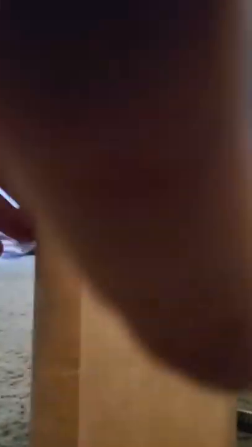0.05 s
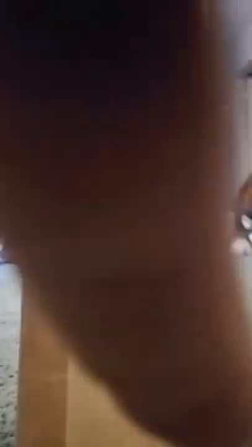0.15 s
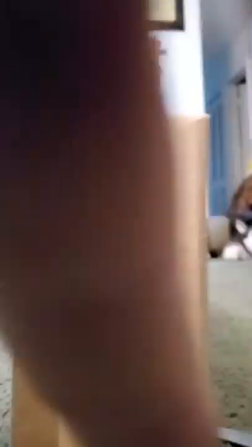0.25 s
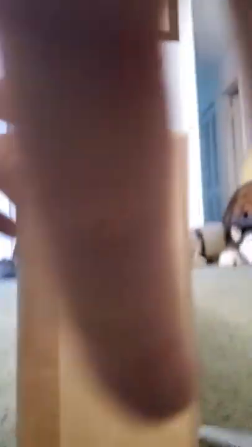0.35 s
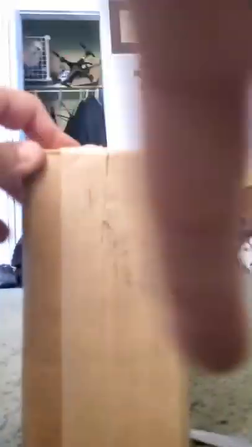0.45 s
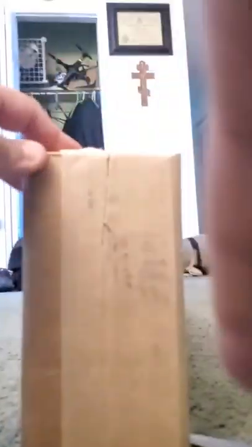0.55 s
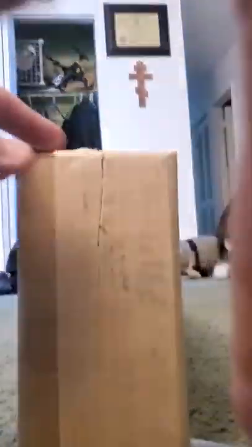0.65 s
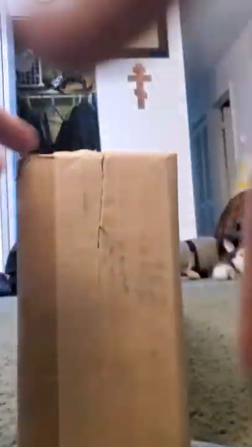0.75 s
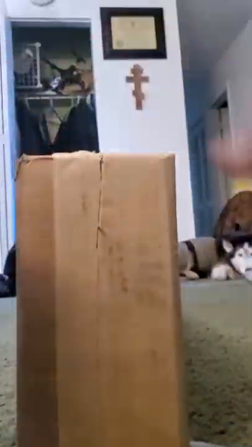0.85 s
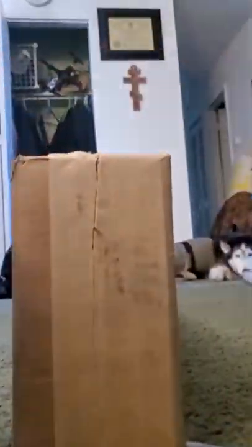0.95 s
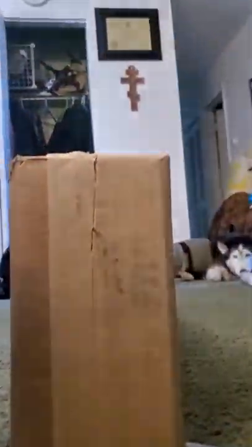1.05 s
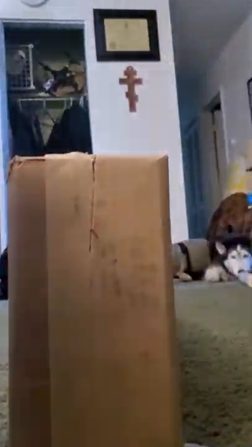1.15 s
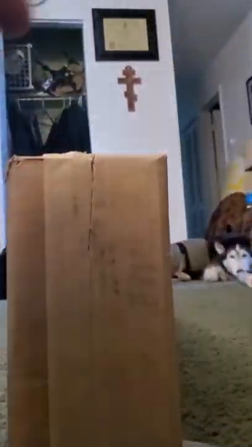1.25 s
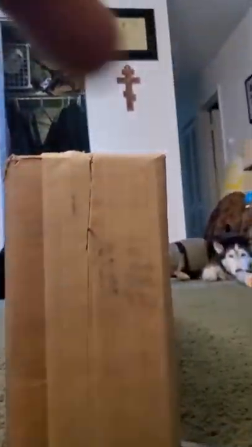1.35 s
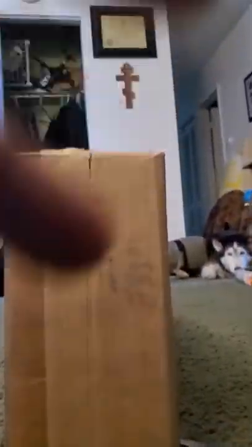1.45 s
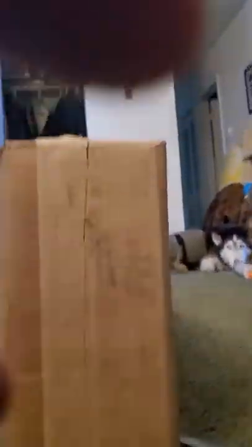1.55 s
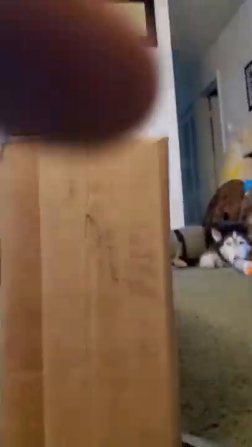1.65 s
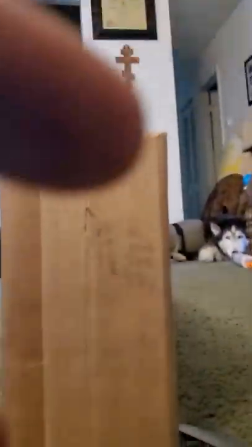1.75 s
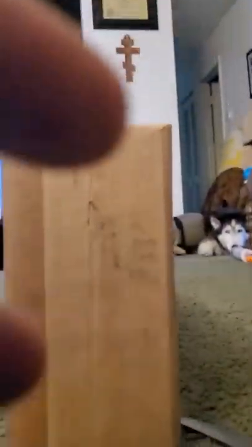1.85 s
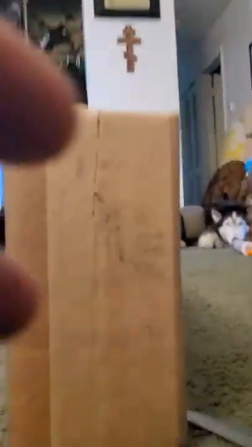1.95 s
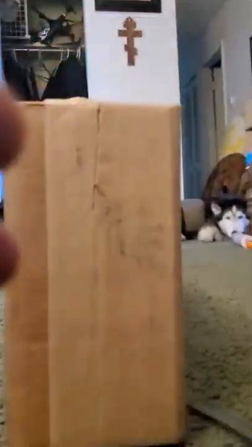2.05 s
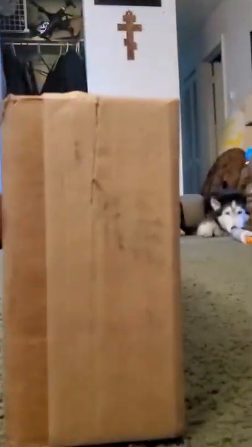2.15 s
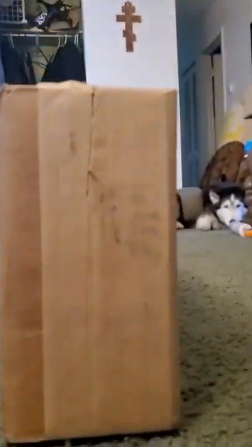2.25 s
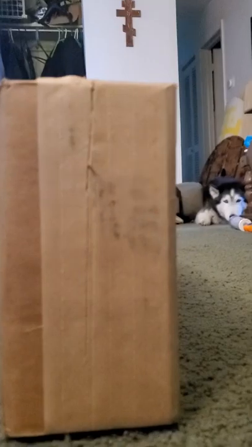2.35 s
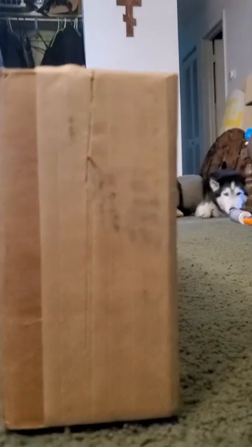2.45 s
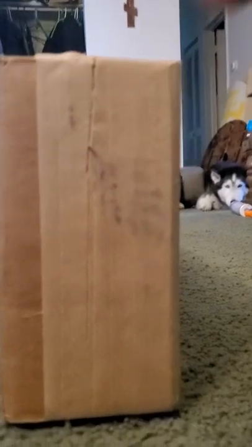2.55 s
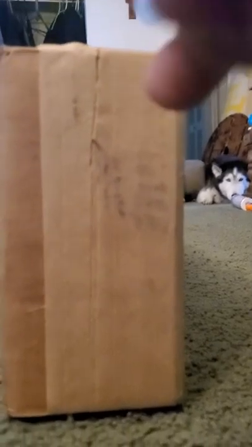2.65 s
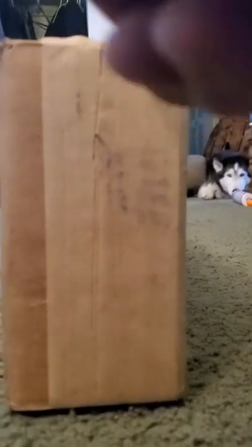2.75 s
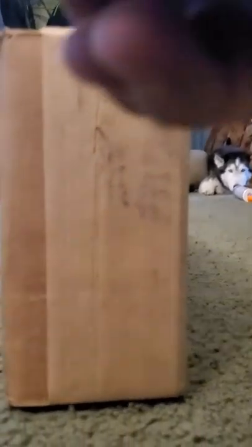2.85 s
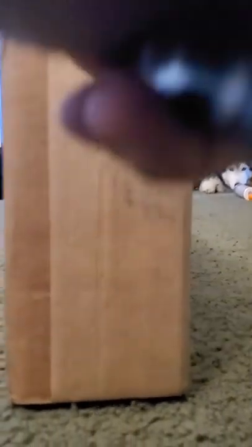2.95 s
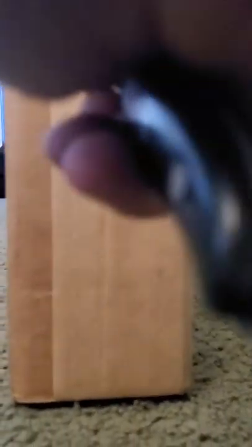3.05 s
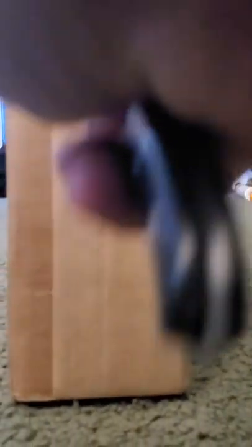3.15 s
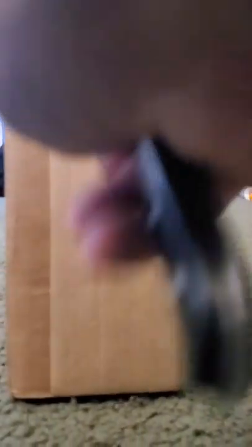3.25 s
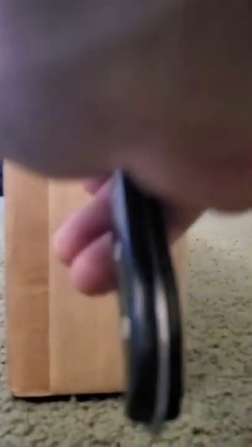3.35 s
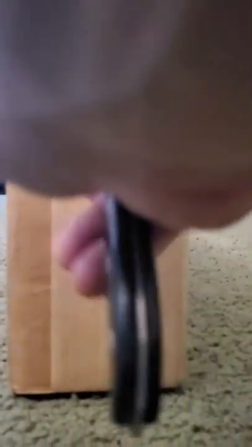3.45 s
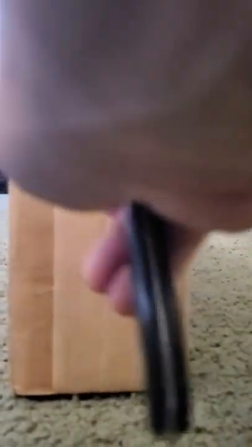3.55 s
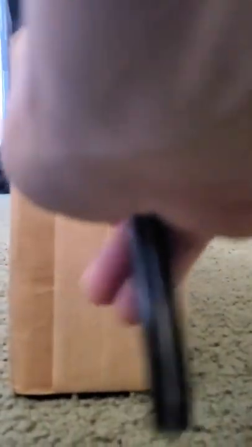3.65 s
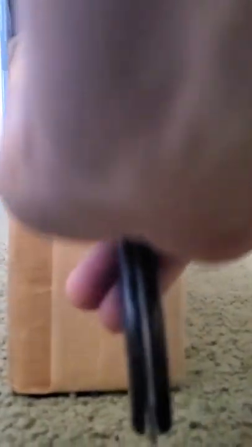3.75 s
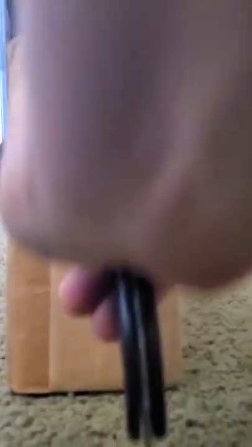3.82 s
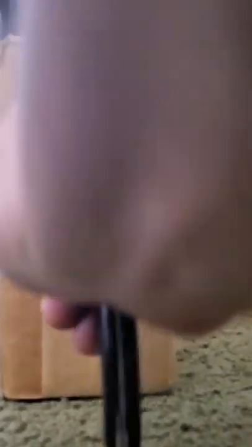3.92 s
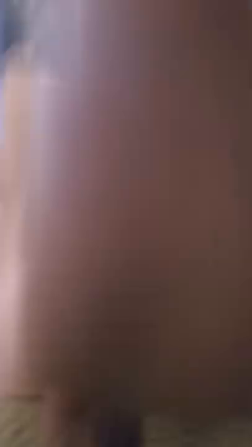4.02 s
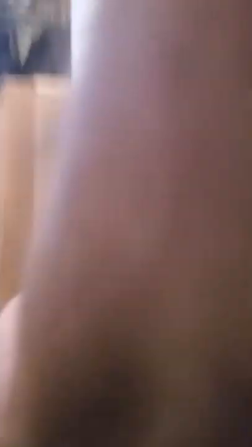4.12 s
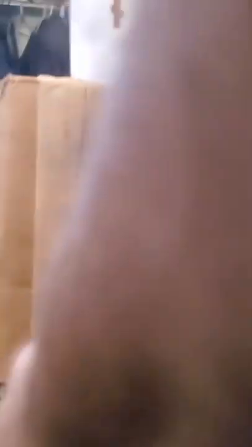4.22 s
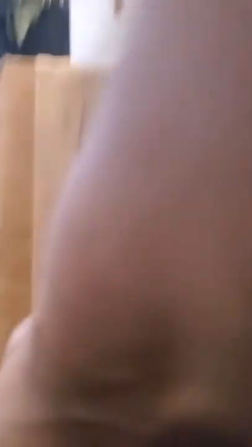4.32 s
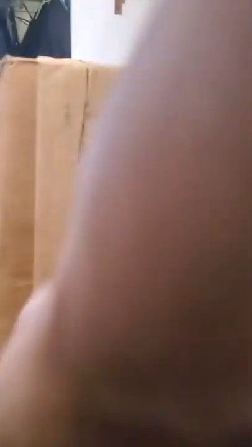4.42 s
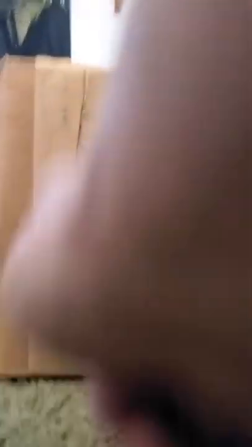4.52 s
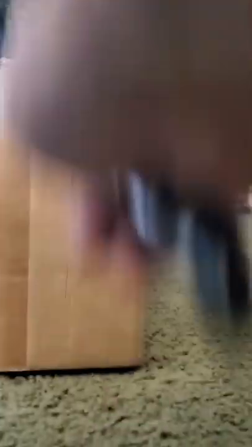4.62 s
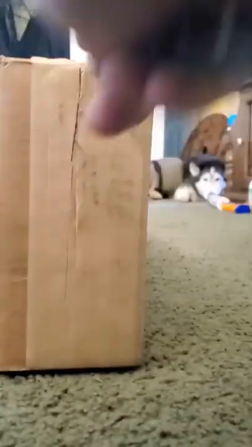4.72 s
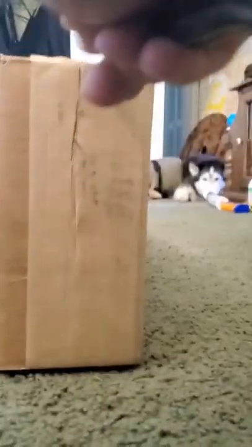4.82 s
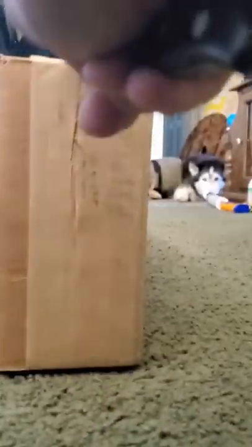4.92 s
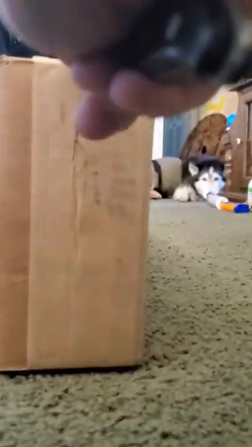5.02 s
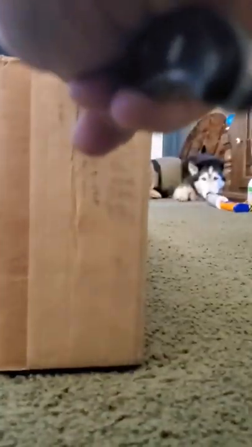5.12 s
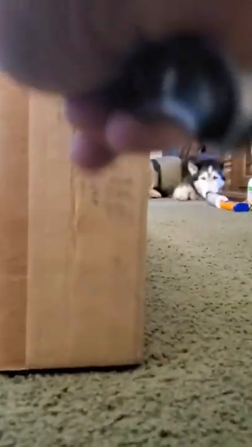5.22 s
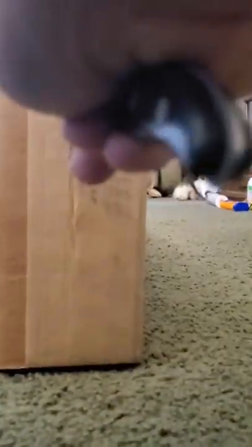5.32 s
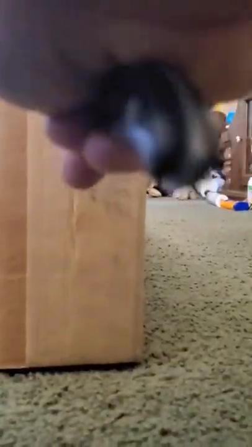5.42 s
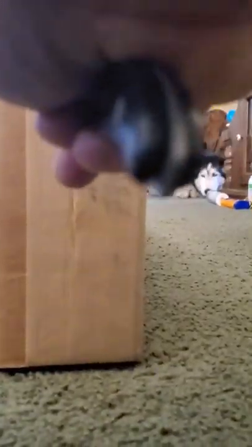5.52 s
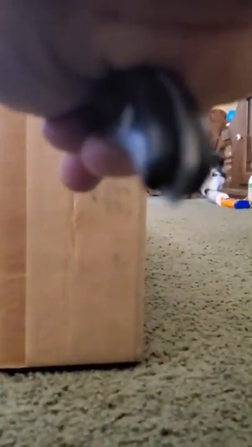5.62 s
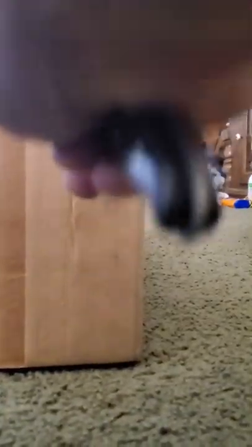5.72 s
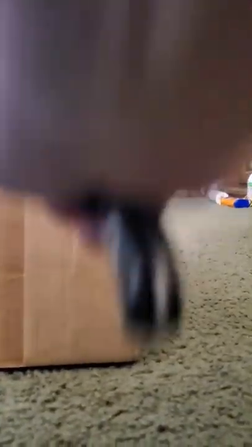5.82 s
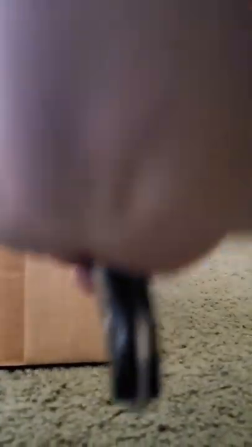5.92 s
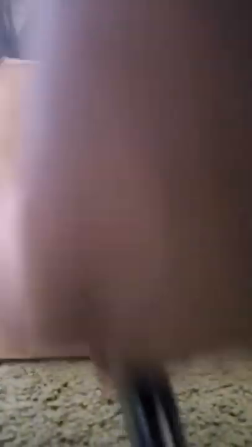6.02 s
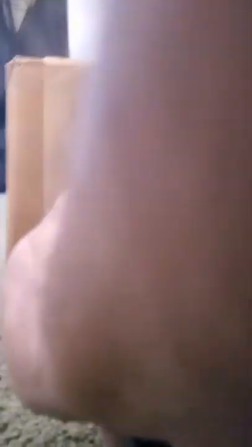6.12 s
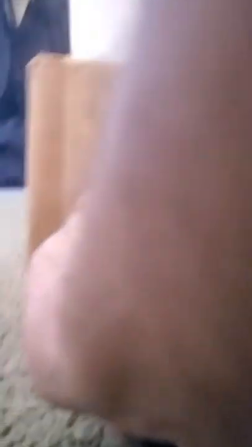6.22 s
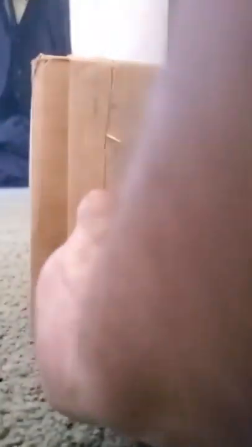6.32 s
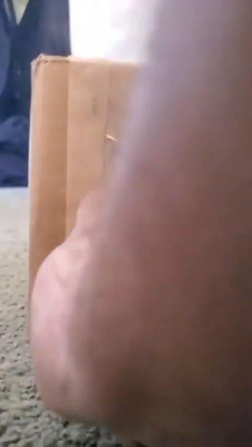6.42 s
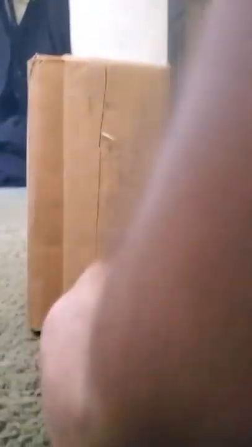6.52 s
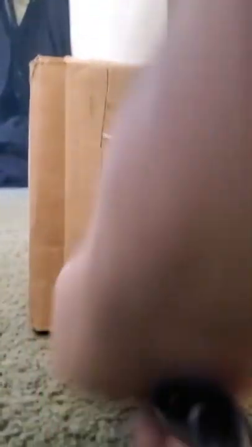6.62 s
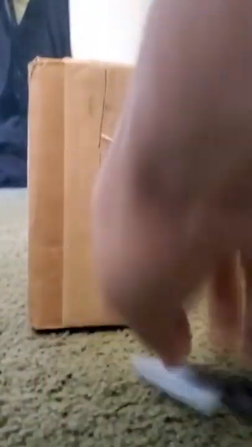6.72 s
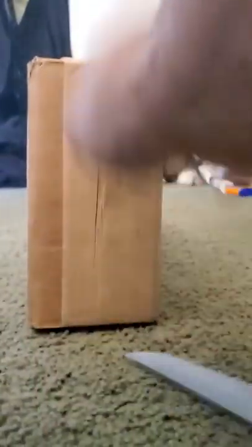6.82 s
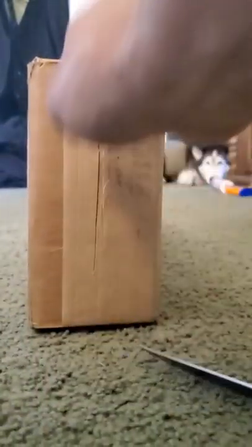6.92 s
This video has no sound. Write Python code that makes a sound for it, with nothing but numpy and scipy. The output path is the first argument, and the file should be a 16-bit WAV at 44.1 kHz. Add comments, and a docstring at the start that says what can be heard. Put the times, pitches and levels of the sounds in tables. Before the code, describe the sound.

Close finger rustling and sticky ticks give way to short tape rips, dull knocks on a cardboard box and a brief blade scrape.

```python
"""On a carpet in a quiet, humming room, hands work packing tape and a folding knife by a cardboard box.
Strokes stick and slip: they rip, scrape and drum dully in the box and floor, among knocks and the
ticks of snapping glue. Fingers rub, and the blade slides open, steel on steel. We listen from a phone
close by that rocks a little; its left microphone port has a bright resonance, its right one is dull."""
import sys
import numpy as np
from scipy import signal
from scipy.fft import rfft, irfft, next_fast_len
from scipy.io import wavfile
from scipy.ndimage import uniform_filter1d, map_coordinates

SR = 44100
rng = np.random.default_rng(int(sys.argv[2]) if len(sys.argv) > 2 else 0)


def wrap_up_sound(samples):
    """Save the sound to the file named by the first command line argument, as 16-bit audio."""
    columns = np.atleast_2d(samples).T
    # keep every value between -1 and 1, then stretch to whole-number steps
    tamed = np.clip(columns, -1, 1)
    steps = np.round(tamed * 32767).astype(np.int16)
    wavfile.write(sys.argv[1], SR, steps)


N = 307677


def amp(db):
    return 10 ** (np.asarray(db) / 20)


def unit(x):
    return x / np.sqrt(np.mean(x ** 2) + 1e-20)


def sides(pan_db):
    """Left and right gains. Pan is always left minus right, in dB."""
    return amp(np.array([pan_db / 2, -pan_db / 2]))


def along(points, hz):
    """Read a curve of (Hz, value) points on a log frequency axis."""
    freqs, values = np.transpose(points)
    return np.interp(np.log(hz + 1), np.log(freqs + 1), values)


def curves(rows):
    """Fader moves: one value per sample for each column after the time."""
    times, *columns = np.transpose(rows)
    return [np.interp(np.arange(N) / SR, times, column) for column in columns]


def wobble(rate):
    """A smooth random curve, rate knots a second."""
    knots = rng.standard_normal(int(N * rate / SR) + 4)
    return map_coordinates(knots, [np.arange(N) * rate / SR])


def bursts(start, length, level_db, rise, fall, swell=0):
    """The joint envelope in dB of events that rise, swell or sag, and fall, all in dB per second."""
    grid = np.arange(0, N, 16)
    since = grid / SR - start[:, None]
    length, level_db, swell = (np.reshape(v, (-1, 1)) for v in (length, level_db, swell))
    shape_db = rise * np.minimum(since, 0) + swell * np.clip(since, 0, length)
    shape_db -= fall * np.maximum(since - length, 0)
    power = amp(2 * (level_db + shape_db)).sum(axis=0)
    return np.interp(np.arange(N), grid, 10 * np.log10(power + 1e-20))


def filtered(x, response):
    """x through a complex frequency response."""
    size = next_fast_len(N + SR // 2)
    return irfft(rfft(x, size) * response(np.fft.rfftfreq(size, 1 / SR)), size)[..., :N]


def eq(x, points):
    """x through an EQ curve of (Hz, dB) points."""
    return filtered(x, lambda f: amp(along(points, f)))


def resonances(modes):
    """The response of (Hz, width in Hz, dB) modes of alternating polarity."""
    return lambda f: sum((-1) ** k * amp(db) * 1j * f * width / (hz * hz - f * f + 1j * f * width)
                         for k, (hz, width, db) in enumerate(modes))


def coloured(x, spectrum):
    """x in the given colour, which shifts in patches as the rubbed surface bends and creases."""
    frames = signal.stft(eq(x, spectrum))[2]
    patches = rng.standard_normal(frames.shape[-2:])
    patches = uniform_filter1d(uniform_filter1d(patches, size=5, axis=0), size=9, axis=1)
    return unit(signal.istft(frames * amp(3.15 * unit(patches)))[1][..., :N])


def slips(rate, spread_db, smooth):
    """Stick-slip: rate tiny breaks a second, uneven in size, over a share of smooth sliding."""
    size_db = spread_db * np.minimum(rng.exponential(size=N), 3.5)
    breaks = (rng.random(N) < rate / SR) * rng.choice([-1, 1], N) * amp(size_db)
    return np.sqrt(1 - smooth) * unit(breaks) + np.sqrt(smooth) * rng.standard_normal(N)


# The colour of room and microphone noise. Each row: frequency in Hz, gain in dB.
AIR_EQ = [(15, -71), (25, -47.5), (58, -0.5), (92, -8.5), (124, 0), (187, -9), (273, -10.5), (330, -10.5),
          (445, -20.5), (483, -11.5), (902, -25), (15200, -56), (16500, -44.5)]
# Where that noise leans. Each row: frequency in Hz, pan in dB.
AIR_PAN = [(60, 3), (240, -1.5), (950, -9.5), (3770, 21.5), (15000, 16)]

def air(level_db=-55):
    """A steady bed of noise, shared by the ports in the bass only."""
    mid, side = rng.standard_normal((2, N))
    width = lambda f: np.arccos(along([(100, 0.95), (400, 0.7), (1200, 0.02)], f)) / 2
    mid = filtered(mid, lambda f: amp(along(AIR_EQ, f)) * np.cos(width(f)))
    side = filtered(side, lambda f: amp(along(AIR_EQ, f)) * np.sin(width(f)))
    bed = filtered(np.array([mid + side, mid - side]), lambda f: sides(along(AIR_PAN, f)))
    return amp(level_db + 0.61 * wobble(2.9)) * unit(bed)


# An appliance's tones. Each row: pitch in Hz, relative level in dB.
HUM_TONES = [(76, -59), (119.5, -61), (480, -69)]

def hum():
    """An appliance drones, each tone drifting slightly in level and phase."""
    t = np.arange(N) / SR
    return sum(amp(db + 4.0 + 1.6 * wobble(2.0)) * np.sin(2 * np.pi * hz * t + 0.38 * wobble(5.1))
               for hz, db in HUM_TONES)


# The room's decay. Each row: frequency in Hz, seconds to fall 60 dB.
ROOM_DECAY = [(200, 0.17), (10000, 0.083)]

def room(x):
    """A short reverb whose treble dies first."""
    hz, t, frames = signal.stft(rng.standard_normal((2, SR // 2)), SR, nperseg=256)
    decay = amp(-60 * t / along(ROOM_DECAY, hz)[:, None])
    tail = signal.istft(frames * decay, SR, nperseg=256)[1]
    return signal.fftconvolve(x, tail / np.linalg.norm(tail[0]), axes=1)[:, :N]


# The rumble of the swaying phone. Each row: frequency in Hz, gain in dB.
SWAY_EQ = [(15, -2.5), (45, 4), (100, -7), (300, -79.5)]
# Jolts that rock it on the pile. Each row: time in seconds, relative peak in dB.
PHONE_JOLTS = [(0.42, -46), (0.53, -45), (1.516, -37), (1.555, -42), (3.92, -40), (4.06, -28), (4.16, -25),
               (4.33, -35), (6.1, -29), (6.18, -30.5), (6.41, -45.5), (6.58, -35), (6.9, -38)]

def rocking(rest_db=-61.5):
    """The phone's own slow motion, felt mostly by the right port."""
    time, peak_db = np.transpose(PHONE_JOLTS)
    level = amp(rest_db) + amp(bursts(time, 0, peak_db, rise=901.5, fall=159))
    shared, left_only = eq(rng.standard_normal((2, N)), SWAY_EQ)
    return level * np.array([0.7 * unit(0.6 * shared + left_only), 2.05 * unit(shared)])


# The crackle's fader. Each row: time in seconds, relative level in dB.
CRACKLE_FADER = [(1.45, -92), (1.6, -68), (2.1, -65), (2.5, -67.5), (3.15, -63.5), (3.9, -82)]

def crackle():
    """Dry clicks from sleeve and tape beside the right port."""
    level_db, = curves(CRACKLE_FADER)
    colour = [(1000, -19), (4000, 5.5), (8000, -11.5), (16000, -9.5)]
    clicks = unit(eq(slips(90, spread_db=3.5, smooth=0), colour))
    return amp(level_db) * clicks * sides(-23.0)[:, None]


# Fingertip buzzes. Each row: start in seconds, length in seconds, relative level in dB, pitch in Hz.
FINGERTIP_SHUDDERS = [(0.045, 0.1, -43, 101), (0.273, 0.079, -42, 104.8), (0.414, 0.016, -39, 74.8)]

def shudders():
    """A wavering low tone while skin sticks and slips on the phone's back."""
    out, t = np.zeros(N), np.arange(N) / SR
    for start, length, db, hz in FINGERTIP_SHUDDERS:
        level_db = bursts(np.array([start]), length, db, rise=600, fall=700) + 1.3 * wobble(30.3)
        out += amp(level_db) * np.sin(2 * np.pi * hz * t + 0.68 * wobble(29.0))
    return out * sides(2.2)[:, None]


# The colours of skin rub, finger rustle and the left port's fizz. Each row: frequency in Hz, gain in dB.
RUB_EQ = [(60, -10), (110, -2), (250, -1), (500, 2.5), (900, -2.5), (1400, -9), (2500, -24.5)]
FINGER_RUSTLE_EQ = [(700, -3), (1300, -4.5), (1700, 0), (2200, -3), (2600, -4), (4200, -5.5), (6500, -11),
                    (10000, -21), (16000, -18)]
FIZZ_EQ = [(4000, -25.5), (7000, -12), (11400, -11), (12200, -3), (14000, -1.5), (16000, -2.5)]
# The hollow of the hand over the right port. Each row: centre in Hz, width in Hz, gain in dB.
HAND_HOLLOW = [(2100, 500, 0)]
# Faders for fingers on phone, box and knife.
# Each row: time in seconds, then rub, rustle, rustle pan and fizz, all in dB.
FINGER_FADERS = [(0.0, -39.5, -55.5, -15, -50), (0.046, -40.5, -42, -10, -39),
                 (0.075, -47.5, -46.5, -11, -41), (0.15, -38, -49, -9, -50), (0.17, -45, -40.5, 1.5, -34.5),
                 (0.24, -52.5, -46, 5, -44.5), (0.32, -41, -45.5, -9, -50), (0.504, -39, -47.5, -21, -49.5),
                 (0.56, -51.5, -50, -9.5, -48), (0.65, -51, -48, -15.5, -54),
                 (0.77, -59, -57, -19.5, -56.5), (0.89, -68, -54.5, 5, -48.5), (1.0, -60, -49.5, -9.5, -53),
                 (1.33, -61.5, -51.5, -3, -53), (1.5, -67, -60, -4, -62.5), (1.52, -44, -52, -28.5, -66.5),
                 (1.545, -70, -63, -21, -62), (1.57, -58.5, -49, -25.5, -69.5),
                 (1.65, -70, -61.5, -19.5, -70), (1.73, -65.5, -54, -28.5, -72),
                 (1.82, -66.5, -69, -13.5, -72.5), (1.9, -57.5, -50, -21, -56.5),
                 (2.05, -58.5, -51.5, -21.5, -67), (2.17, -56.5, -60, -4, -57),
                 (2.35, -71, -47, 0.5, -47.5), (2.54, -60.5, -58, 1, -53), (2.57, -73, -50.5, -7, -40),
                 (2.72, -57.5, -51.5, -6, -50), (2.8, -66.5, -51, -5.5, -65), (2.93, -62, -49, 0, -47.5),
                 (3.05, -67, -54, -8.5, -64.5), (3.36, -67, -58, -1, -57.5), (3.8, -65, -54.5, -4, -56),
                 (4.55, -72.5, -60, -3.5, -58.5), (4.87, -73, -63, -3, -55.5), (5.06, -71, -83, 4, -49.5),
                 (5.45, -65, -70.5, 19, -56), (5.7, -79, -72, -7, -71), (6.0, -54.5, -55, 3, -52.5),
                 (6.35, -50.5, -52, -4, -49.5), (6.5, -75, -62, -3, -57.5), (6.98, -69, -60, -2, -62.5)]

def fingers():
    """Skin drags near the ports: a broad rub, a hollow crackly rustle and a bright fizz."""
    rub_db, rustle_db, pan_db, fizz_db = curves(FINGER_FADERS)
    shake_db = 0.53 * wobble(16)  # the hand's speed is unsteady
    drag = np.array([slips(500, spread_db=1.5, smooth=0.84), slips(500, spread_db=1.0, smooth=1.0)])
    mid, side = coloured(drag, RUB_EQ)
    skin = np.array([mid + 0.96 * side, mid - 0.68 * side])
    rub = amp(rub_db + 0.75 * wobble(24.73)) * sides(-6.0)[:, None] * skin
    fine = np.array([slips(900, spread_db=4.5, smooth=0.67), slips(700, spread_db=5.0, smooth=0.66)])
    rustle = amp(rustle_db + shake_db - 1.0) * sides(pan_db) * coloured(fine, FINGER_RUSTLE_EQ)
    cupped = np.clip(-pan_db / 25, 0, 1) ** 2  # the closer the hand to the right port, the more it rasps
    rasp = unit(filtered(fine[1], lambda f: resonances(HAND_HOLLOW)(f) ** 2))  # two passes narrow it
    rustle[1] += amp(rustle_db + shake_db + 0.5) * cupped * rasp
    finest = np.array([slips(2800, spread_db=1.5, smooth=0.2), slips(800, spread_db=-7.5, smooth=0.29)])
    fizz = amp(fizz_db + shake_db + [[5.5], [-8]]) * coloured(finest, FIZZ_EQ)
    return rub + rustle + fizz


# The blade's ringing bands. Each row: centre in Hz, width in Hz, gain in dB.
BLADE_MODES = [(1020, 200, 11.5), (2670, 210, 17), (3500, 440, 8), (4980, 160, 6), (12900, 930, 7)]
# The fader for its slide. Each row: time in seconds, level in dB.
BLADE_FADER = [(5.066, -69), (5.078, -43), (5.15, -49.5), (5.24, -55), (5.3, -98)]

def blade():
    """The knife opens: steel slides on steel and sings in a few fuzzy bands."""
    level_db, = curves(BLADE_FADER)
    friction = rng.standard_normal((2, N))
    lean_left = lambda f: sides(along([(3000, 6.4), (12000, 30.6)], f))
    return amp(level_db) * unit(filtered(friction, lambda f: resonances(BLADE_MODES)(f) * lean_left(f)))


# Glue and fibres snapping. Each row: start in seconds, relative level in dB, pan in dB, pitch in Hz.
GLUE_SNAPS = [(1.52, -26, -27, 1230), (1.603, -27.5, -35, 2180), (1.681, -28.5, -16, 1670),
              (1.698, -28.5, -23, 2140), (1.715, -37.5, -18, 2280), (1.7235, -34, -20, 3500),
              (1.9387, -26.5, -20, 2050), (1.969, -30.5, -16, 4000), (2.007, -26.5, -21.5, 1900),
              (1.9748, -24, -24, 2390), (2.044, -28, -21, 4000), (2.121, -27, -22, 3500),
              (2.07, -29, -22.5, 2200), (2.257, -29.5, -11, 2680), (2.695, -27.5, -18.5, 4500),
              (2.7507, -28.5, -25.5, 2200), (2.8, -24.5, -15.5, 4200), (2.821, -28.5, -15.5, 3030),
              (2.921, -34, -8, 3100), (2.957, -32.5, -10, 3900), (3.0853, -32.5, -15, 4270),
              (3.1035, -28, -23.5, 4030), (3.1993, -22, -13.5, 4400), (3.252, -37.5, -21, 4360),
              (3.259, -30.5, -18, 4000), (3.517, -28, -23, 4500), (3.871, -29.5, -21, 4580),
              (3.8995, -17, 20, 5300), (4.0526, -19, 18, 5760), (4.2891, -18, 2, 1900),
              (4.354, -41, -10, 3000), (4.438, -30, -21, 5370), (4.7369, -15, 17, 3730),
              (4.771, -22.5, 23, 2400), (4.9536, -31, 26, 2500), (5.3195, -26, 2, 2730),
              (5.3806, -34.5, 14, 4500), (5.9, -25.5, 17, 6040), (6.0876, -6.5, 18, 3670),
              (6.2425, -21.5, -16.5, 1730), (6.276, -38, 15, 3170), (6.4475, -37, 12, 4430),
              (6.529, -27, 21, 2480), (6.5628, -19, 10, 3000)]

def ticks():
    """Each snap is a cycle or two at its pitch, with a rough edge that differs at each port."""
    out, t = np.zeros((2, N + SR)), np.arange(SR // 100) / SR
    for start, db, pan_db, hz in GLUE_SNAPS:
        snap = amp(-60 * t * hz / 3.04) * np.sin(2 * np.pi * hz * t)
        edge = 0.2 * amp(-60 * t / 0.0049) * rng.standard_normal((2, len(t)))
        gains = amp(db + 4) * sides(pan_db)[:, None] / sides(pan_db).mean()
        out[:, round(start * SR):][:, :len(t)] += gains * (snap + edge)
    return filtered(out[:, :N], lambda f: 1j * f / (700 + 1j * f))  # low cut at 700 Hz


def box_at_ports(x):
    """The box reaches the left port first; its upper notes favour the right port."""
    lead = lambda f: np.exp(np.outer([1j, -1j], 0.44 * f / 800))
    return filtered(x, lambda f: sides(along([(200, -2.0), (400, -3.5), (700, -8.0)], f)) * lead(f))


# Knocks into box and floor. Each row: start in seconds, relative level in dB, pitch in Hz.
BOX_KNOCKS = [(0.043, -29.5, 293), (0.148, -26, 225), (1.276, -24.5, 482), (3.015, -29.5, 197),
              (3.159, -20, 207), (3.411, -15.5, 222), (3.47, -25, 200), (3.609, -39.5, 330),
              (3.897, -27.5, 290), (4.054, -13.5, 516), (4.1227, -1, 299), (4.144, -6, 267),
              (4.166, -3.5, 294), (4.1735, -8, 290), (4.229, -13, 340), (4.2882, -11.5, 483),
              (4.672, -30, 430), (4.7353, -15.5, 240), (4.76, -16.5, 200), (4.955, -18.5, 213),
              (5.083, -33, 248), (5.321, -17.5, 261), (5.9, -27.5, 341), (6.0887, -8, 324),
              (6.1025, -1, 458), (6.1169, -9.5, 262), (6.133, -12, 332), (6.514, -25.5, 293),
              (6.527, -9.5, 255), (6.5456, -18, 377), (6.562, -18, 400), (6.876, -19, 198)]

def knocks():
    """A soft blow: a few damped cycles at its pitch, with a weaker, shorter overtone."""
    out, t = np.zeros(N + SR), np.arange(SR // 8) / SR
    attack = 1 - np.exp(-t / 0.0012)
    for start, db, hz in BOX_KNOCKS:
        body = amp(-60 * t / 0.028) * np.sin(2 * np.pi * hz * t)
        overtone = amp(-14.5 - 60 * t / 0.019) * np.sin(2 * np.pi * 2.054 * hz * t)
        out[round(start * SR):][:len(t)] += amp(db + 3.5) * (body + overtone) * attack
    return box_at_ports(out[:N])


# The cardboard box's body. Each row: centre in Hz, width in Hz, gain in dB.
BOX_MODES = [(179.5, 96, -3), (246.3, 35, 5), (308.2, 20, 2.5), (426, 95, -3), (600, 166, -7),
             (860, 204, -11.5), (1008, 280, -17.5)]

def drumming(level_db):
    """Coarse slips set the box's modes ringing."""
    coarse = amp(level_db) * slips(250, spread_db=3.5, smooth=0.23)
    body = resonances(BOX_MODES)
    noise_gain = np.std(filtered(rng.standard_normal(N), body))
    return box_at_ports(amp(-2.0) * filtered(coarse, body) / noise_gain)


# The colours of the tape and of the dull right port. Each row: frequency in Hz, gain in dB.
TAPE_EQ = [(600, -7), (1200, -3.5), (2000, 1), (3200, 2), (5000, -0.5), (8000, -6.5), (12000, -7.5),
           (16000, -3)]
RIGHT_PORT_EQ = [(2000, 3), (8000, -12.5), (15000, -14)]

def tape_rustle():
    """Fine slips in the tape. The ports face opposite ways, so they share the lows in opposite phase."""
    fine = np.array([slips(1800, spread_db=5.0, smooth=0.26), slips(2000, spread_db=3.5, smooth=0.66)])
    left, separate = coloured(fine, TAPE_EQ)
    shared = lambda f: along([(1000, 1.0), (2500, 0.35), (5000, 0.066)], f)
    dull = lambda f: amp(along(RIGHT_PORT_EQ, f))
    right = filtered(-left, lambda f: shared(f) * dull(f))
    right += filtered(separate, lambda f: np.sqrt(1 - shared(f) ** 2) * dull(f))
    return np.array([left, right])


# Strokes of tape and knife at the carpet. Each row: start in seconds, length in seconds, relative
# levels of drumming, rustle and fizz in dB, swell in dB per second, rustle pan in dB.
CARPET_STROKES = [(3.002, 0.043, -41, -50, -70, 46, 2), (3.148, 0.038, -36.5, -51, -68, -100, 7.5),
                  (3.405, 0.013, -34, -48.5, -80, -100, 4), (3.456, 0.045, -48.5, -53.5, -56, -4, 2),
                  (3.593, 0.053, -46.5, -57.5, -44, -2.5, 4), (3.893, 0.059, -35, -48, -37.5, -120, 0.5),
                  (4.005, 0.049, -42, -57, -46.5, 2, 7), (4.052, 0.01, -21.5, -32, -28, -100, -1.5),
                  (4.073, 0.059, -20.5, -28, -30, 39, -3), (4.142, 0.032, -9.5, -23.5, -21, -79.5, 2),
                  (4.185, 0.047, -20.5, -36.5, -32, -4, 4), (4.219, 0.034, -17, -32, -25, -150, 1),
                  (4.266, 0.03, -27.5, -40.5, -39, 150, 1), (4.341, 0.075, -35.5, -57, -75.5, -97, -12.5),
                  (4.667, 0.015, -44, -50.5, -46, 0, 4), (4.699, 0.044, -32.5, -43, -37, 3, 3),
                  (4.734, 0.0072, -24, -36, -41, -300, 4), (4.756, 0.011, -30, -40.5, -35, 0, 4),
                  (4.947, 0.12, -45, -69, -66, -100, 4), (5.069, 0.044, -37, -56.5, -69.5, -14, 9),
                  (5.234, 0.05, -49, -71.5, -68, 45, 9), (5.304, 0.035, -36, -55.5, -48, 103, 4.5),
                  (5.892, 0.022, -38.5, -53, -42, -120, -4), (5.981, 0.076, -50.5, -68, -59, 192, 4.5),
                  (6.052, 0.018, -26, -50.5, -47, 400, 6), (6.069, 0.03, -24, -29, -30.5, 8, 6),
                  (6.106, 0.041, -15.5, -30.5, -33, -100, 5.5), (6.138, 0.019, -38, -35.5, -32.5, -2, 9),
                  (6.163, 0.12, -31, -46, -40.5, -130, 3), (6.263, 0.055, -41.5, -48.5, -40, -100, 0.5),
                  (6.528, 0.025, -13, -34.5, -27, -100, 8), (6.559, 0.078, -33.5, -54.5, -51, -120, 7)]

def strokes():
    """Each stroke slips unevenly: coarse slips drum the box, fine ones rustle and fizz."""
    grip, lift, ring_out = 2200, 1095.5, 433  # dB per second: sets in, lets go, the box rings on
    start, length, drum_db, rustle_db, fizz_db, swell, pan_db = np.transpose(CARPET_STROKES)
    drum_db = bursts(start, length, drum_db, grip, ring_out, swell)
    left_db, right_db, fizz_db = (bursts(start, length, db, grip, lift, swell)
                                  for db in (rustle_db + pan_db / 2, rustle_db - pan_db / 2, fizz_db))
    surge_db = 2.5 * wobble(80)  # the glue lets go in surges
    drum = drumming(drum_db + 0.13 * surge_db)
    rustle = amp([left_db, right_db] + surge_db + 6.0) * tape_rustle()
    finest = np.array([slips(2500, spread_db=3.0, smooth=0.21), slips(2000, spread_db=1, smooth=0.4)])
    fizz = amp(fizz_db + surge_db + [[5.5], [-17]]) * coloured(finest, FIZZ_EQ)
    return drum + rustle + fizz


def scene():
    """Close, dry handling over the room tone; only knocks and ticks feed the reverb."""
    blows = knocks() + ticks()
    hands = fingers() + strokes() + blade() + crackle() + shudders()
    return hands + blows + amp(-8) * room(blows) + rocking() + air() + hum()


def record(dry):
    """The phone clips softly at full scale and keeps nothing above its band limit."""
    top_hz = 15760
    clipped = dry / (1 + np.abs(dry) ** 6) ** (1 / 6)
    return filtered(clipped, lambda hz: hz < top_hz)


dry = scene()
out = record(dry)
wrap_up_sound(out)
```